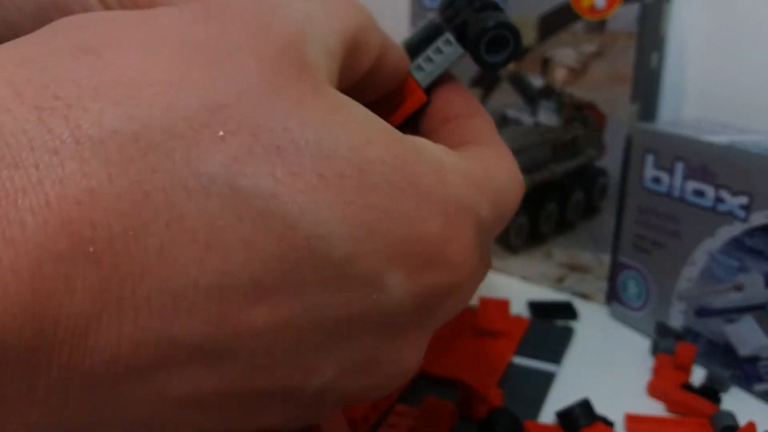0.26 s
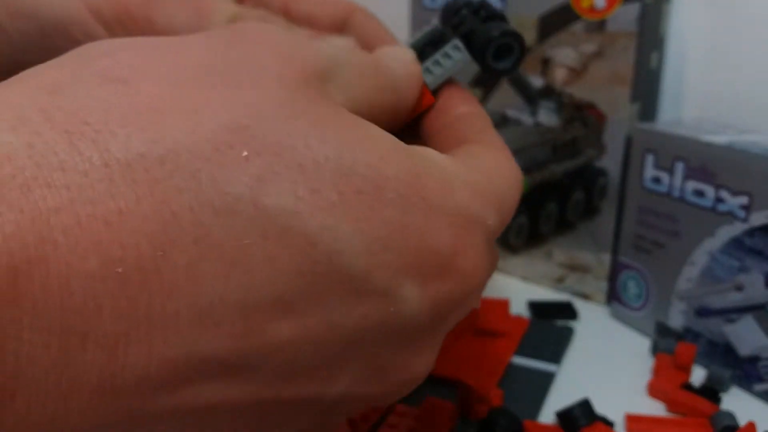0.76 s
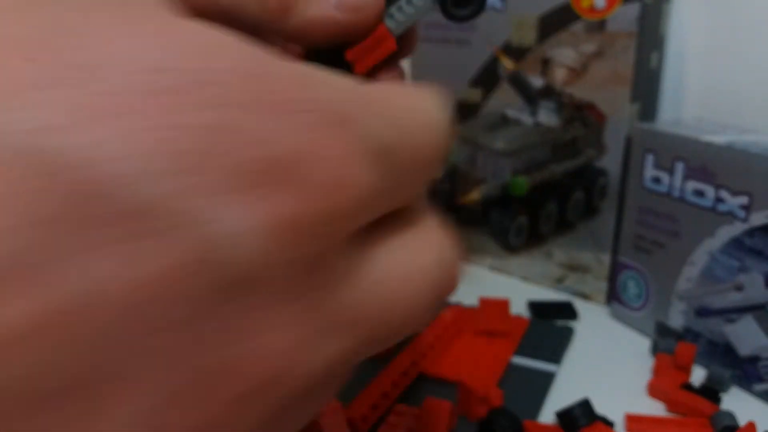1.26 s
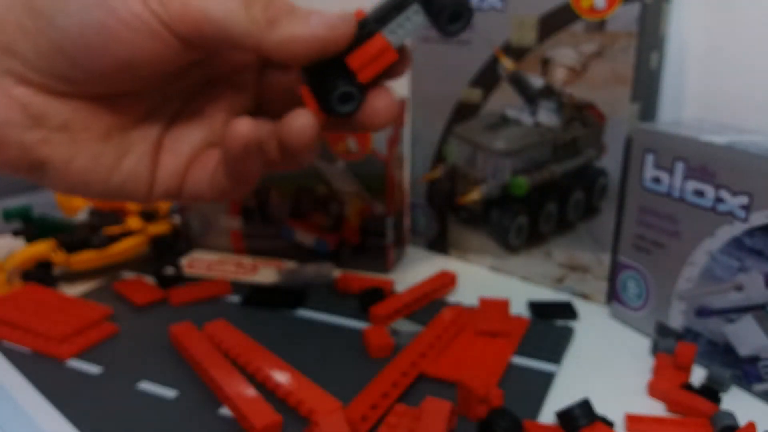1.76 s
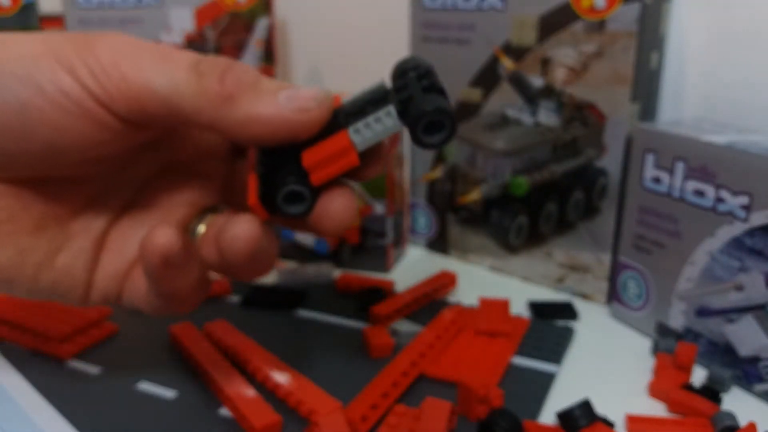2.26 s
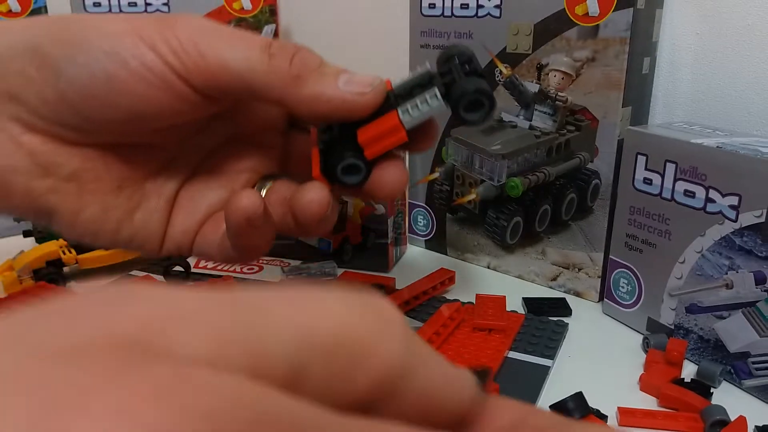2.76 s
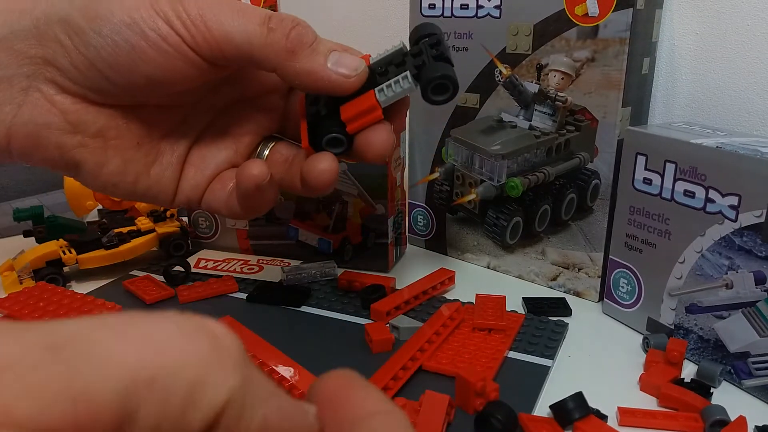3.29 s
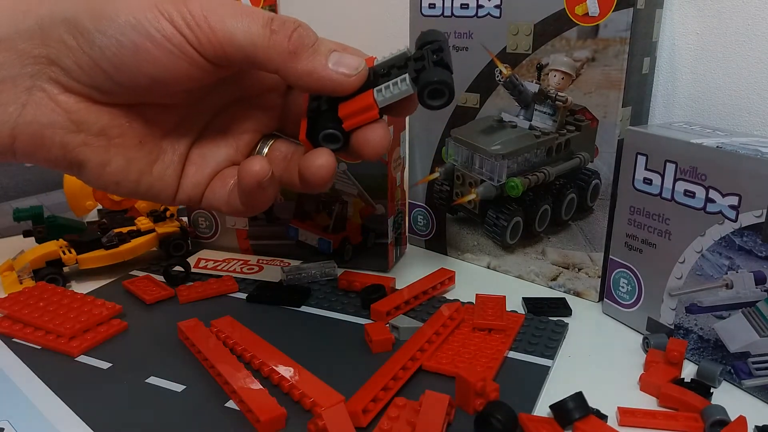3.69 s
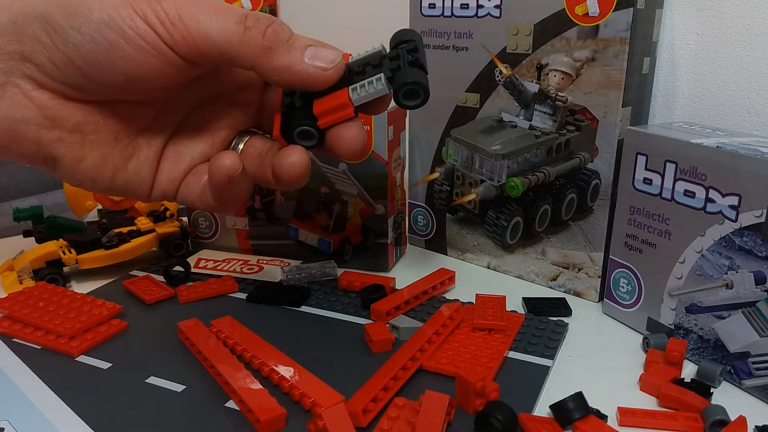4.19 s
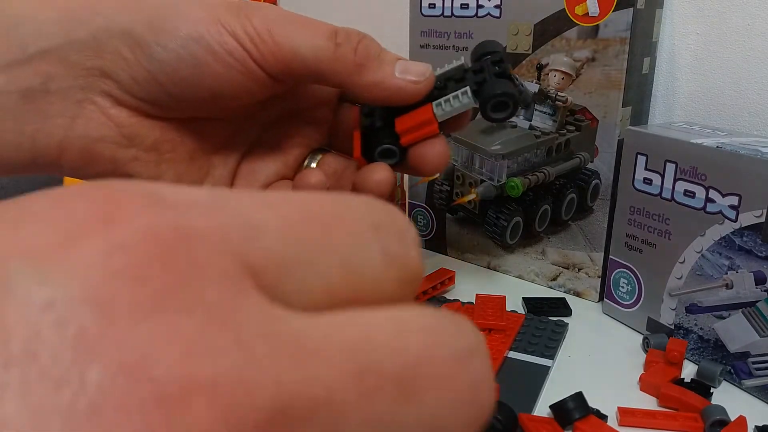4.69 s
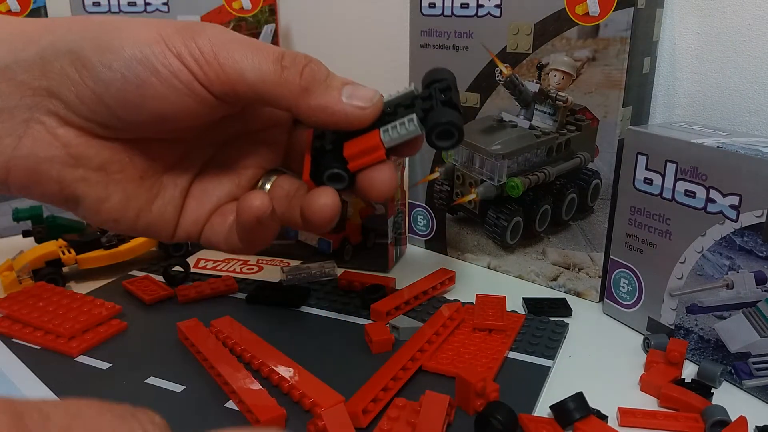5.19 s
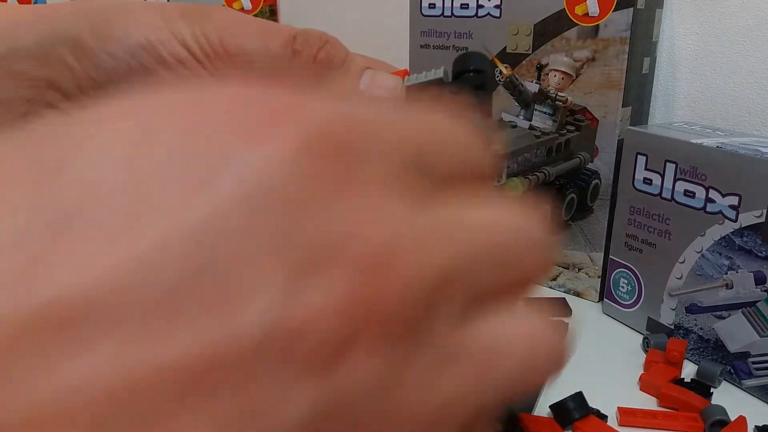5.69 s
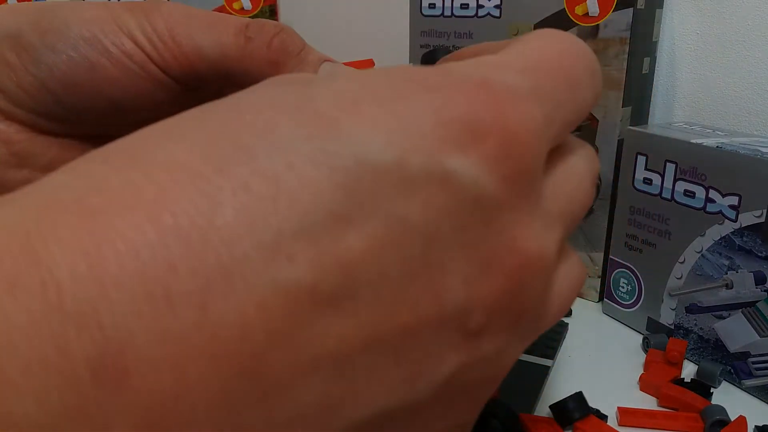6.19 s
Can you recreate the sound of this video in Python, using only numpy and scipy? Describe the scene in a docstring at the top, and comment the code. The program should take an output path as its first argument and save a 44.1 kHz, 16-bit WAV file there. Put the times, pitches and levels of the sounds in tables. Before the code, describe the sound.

Close, dry clicks of small plastic building bricks being handled and dropped on a tabletop in a small quiet room with soft background hiss.

```python
"""Small dry ticks of plastic toy bricks over a steady hiss and a faint mains hum, close up in a small room.
A half-built model ticks and rasps in the fingers, a hand picks among loose bricks: noise bursts, damped
modes and crowds of tiny slips. Loose bricks knock, bounce and settle: double contacts and one weakening
run, ringing a little longer. The table top thuds under them with low modes; early echoes and a short
diffuse tail form the room."""
import sys
import numpy as np
from scipy import signal
from scipy.fft import rfft, irfft
from scipy.io import wavfile

SR = 44100
rng = np.random.default_rng(int(sys.argv[2]) if len(sys.argv) > 2 else 0)


def unload_audio(sound):
    """Save the sound as a 16-bit wav file, at the path given as the first command line argument."""
    columns = np.transpose(np.atleast_2d(sound))
    # keep every value between -1 and 1, then stretch to whole-number steps
    steps = np.round(np.clip(columns, -1, 1) * 32767)
    wavfile.write(sys.argv[1], SR, steps.astype(np.int16))


N = 284434
TOP_HZ = 15900  # upper limit of the recorder
RING_S = 0.25  # length of every ring and of the room response
AGE = np.arange(int(RING_S * SR)) / SR


def undb(db):
    """Decibels to amplitude ratio."""
    return 10 ** (np.asarray(db) / 20)


def unit(x):
    """Scale to an energy of 1."""
    return x / np.sqrt(np.sum(x ** 2))


def fade(t60_s):
    """Exponential decay, 60 dB down after t60_s."""
    return np.exp(-np.log(1000) * AGE / t60_s)


def noise_burst(t60_s):
    """Decaying white noise: modes too crowded to tell apart."""
    return rng.standard_normal(len(AGE)) * fade(t60_s)


def band(x, lo_hz, hi_hz, order=2):
    """Causal band-pass."""
    limits_hz = [lo_hz, min(hi_hz, SR / 2 - 500)]
    return signal.sosfilt(signal.butter(order, limits_hz, "band", fs=SR, output="sos"), x)


def attack_level(x, level_db):
    """Set the rms of the first 5 ms."""
    count = SR // 200
    return x * undb(level_db) / np.sqrt(np.mean(x[:count] ** 2))


def add(track, time_s, x):
    """Mix x into the track at time_s."""
    i = int(time_s * SR)
    track[i:i + len(x)] += x[:N - i]


def ring(modes, detune, scatter_db):
    """Damped modes; each blow lands elsewhere and so weights them anew."""
    hz, level_db, t60_s = np.transpose(modes)
    shift, weight, side = rng.standard_normal((len(hz), 3)).T
    gains = np.sign(side) * undb(level_db + scatter_db * weight)
    detuned_hz = hz * (1 + detune * shift)
    out = np.zeros(len(AGE))
    for gain, mode_hz, mode_t60_s in zip(gains, detuned_hz, t60_s):
        out += gain * np.sin(2 * np.pi * mode_hz * AGE) * fade(mode_t60_s)
    return out


def click(level_db, centre_hz, body_db, edge_db, t60_s, modes, snap_db, modes_db, spread):
    """One contact: a sharp snap, the crowded short modes of the shell, and a few modes that outlast them."""
    shell = unit(noise_burst(t60_s))
    shell[0] += undb(snap_db)  # the contact itself, one brief pulse
    tones = unit(ring(modes, detune=0.006, scatter_db=3.0))
    struck = shell + undb(modes_db) * tones
    # part size sets where it radiates best; plastic damps quickly above that
    wall = band(struck, centre_hz / spread, centre_hz * spread, order=1)
    wall = band(wall, 1220, 6960, order=6)
    # the whole part flexes lower and for longer
    flexing = 1.1 * unit(noise_burst(0.097))
    body = band(flexing + shell + undb(-9) * tones, 474, 1830)
    # hard corners add a bright edge
    edge = band(shell + tones, 5970, 18000)
    out = attack_level(wall, level_db)
    out += attack_level(body, level_db + body_db)
    return out + attack_level(edge, level_db + edge_db)


# loose bricks landing on one edge, then on the other; edge relative to level, second contact to the first:
# (time [s], level [dB], ring centre [Hz], hard edge [dB], second contact [dB])
LANDINGS = [(3.5457, -30.5, 3600, -4, 7.5), (3.6491, -25, 2730, -18, 3.5), (3.6829, -32.5, 2600, -6, -10),
            (3.7308, -33.5, 2800, -8.5, -10), (3.7947, -35.5, 2620, -2.5, 0.5), (3.8252, -38, 3130, -16, 0),
            (4.1094, -53.5, 2330, -17, 9), (4.4733, -25.5, 2470, -11, -15),
            (4.4875, -20.5, 2900, -10.5, -14), (4.5296, -28.5, 3460, -16, -6.5),
            (4.559, -25.5, 3030, -4, -17), (4.5869, -39.5, 3050, -6.5, 5), (4.6155, -36.5, 3000, -17, -6.5),
            (5.433, -42.5, 3530, -2.5, -4)]
SECOND_CONTACT_S = 0.0064


def landings():
    """A brick lands on two edges in turn; yields (time [s], level [dB], ring centre [Hz], hard edge [dB])."""
    for time_s, level_db, centre_hz, edge_db, second_db in LANDINGS:
        yield time_s, level_db, centre_hz, edge_db
        yield time_s + SECOND_CONTACT_S, level_db + second_db, centre_hz, edge_db


# dropped brick rocking until it lies still: (time [s], length [s], level [dB])
RATTLES = [(3.7025, .085, -35)]
ROCK_GAP_S, ROCK_JITTER, ROCK_FALL_DB_PER_S = 0.0115, 0.15, 39.5
ROCK_HZ, ROCK_EDGE_DB = 2550, -13


def rocking():
    """A rocking brick makes uneven, weakening contacts; yields rows like those of landings()."""
    for time_s, length_s, level_db in RATTLES:
        age_s = 0
        while age_s < length_s:
            yield time_s + age_s, level_db - ROCK_FALL_DB_PER_S * age_s, ROCK_HZ, ROCK_EDGE_DB
            age_s += ROCK_GAP_S * np.exp(ROCK_JITTER * rng.standard_normal())


# modes of the loose bricks, relative levels: (frequency [Hz], level [dB], t60 [s])
BRICK_MODES = [(813.5, -7, .07), (1162, 0, 0.055), (1284, -3, 0.071), (1540, -4, 0.081), (1763, 10, 0.022),
               (1934, 2.5, 0.035), (2245, 3.5, 0.031), (2492, -1.5, 0.029), (2793, -6, 0.05),
               (3254, -2.5, 0.032), (3470, -1, 0.032), (4605, 0, .04), (5840, -6.5, 0.088),
               (6210, -9.5, 0.052), (7687, -4, 0.05), (11120, 5.5, 0.032), (15000, -10.5, .03)]
LOOSE_BODY_DB, LOOSE_T60_S = -9.5, 0.036


def loose_bricks():
    """Free bricks ring a little longer as they knock and bounce."""
    out = np.zeros(N)
    for time_s, level_db, centre_hz, edge_db in [*landings(), *rocking()]:
        knock = click(level_db, centre_hz, LOOSE_BODY_DB, edge_db, LOOSE_T60_S, BRICK_MODES,
                      snap_db=-7.5, modes_db=-5, spread=1.365)
        add(out, time_s, knock)
    return out


# light ticks of bricks pressed and shifted in the fingers, and from 2.15 to 2.5 s of a hand picking
# among loose bricks; edge relative to level: (time [s], level [dB], ring centre [Hz], hard edge [dB])
LIGHT_TICKS = [(0.0781, -60, 2980, -34), (0.2096, -62.5, 2380, -32), (0.4244, -63.5, 2900, -15),
               (0.8138, -65.5, 3420, -1), (0.833, -60, 3380, -7), (0.8946, -61, 2880, -14),
               (0.9103, -56.5, 2940, -9), (0.9473, -60.5, 2920, -31), (1.042, -63.5, 2870, -28),
               (1.1985, -44, 3700, -19), (1.231, -56, 3160, -11), (2.1507, -40, 4700, -20),
               (2.1598, -37, 5430, -19), (2.2253, -40, 4400, -13), (2.2466, -37, 3300, -21),
               (2.2555, -34, 3300, -17), (2.2598, -39, 4000, -3), (2.2635, -28, 4600, -16.5),
               (2.319, -35.5, 4400, -19), (2.322, -40, 4750, -28), (2.353, -38, 4570, -11.5),
               (2.4089, -35.5, 2410, -21), (2.4446, -39.5, 4500, -15), (2.4802, -40, 3480, -11),
               (2.4962, -40.5, 3400, -19), (4.214, -55.5, 2660, -19), (5.2766, -43, 3380, -18),
               (5.895, -51, 4100, -14.5), (5.978, -64, 4500, -17), (6.057, -65, 3300, -10),
               (6.4056, -48, 4270, -7)]
# modes of the model in the hand, lent to all light ticks; relative levels:
# (frequency [Hz], level [dB], t60 [s])
MODEL_MODES = [(916, 10, 0.018), (1591, 1.5, 0.049), (1818, 9.5, 0.021), (2002, 4.5, 0.035),
               (2224, 3.5, 0.025), (3160, -10, 0.075), (3543, 0, 0.053), (4120, -12, 0.13),
               (4750, -12, 0.15), (5560, -26.5, 0.052), (6200, 2, 0.023), (6660, 2, 0.038)]
TICK_BODY_DB, TICK_T60_S = -15, 0.034  # fingers damp the low flexing of the part


def light_ticks():
    """Short, dry, finger-damped ticks: studs slipping in their sockets, bricks picked at by the hand."""
    out = np.zeros(N)
    for time_s, level_db, centre_hz, edge_db in list(LIGHT_TICKS) + catches():
        tick = click(level_db, centre_hz, TICK_BODY_DB, edge_db, TICK_T60_S, MODEL_MODES,
                     snap_db=-4.5, modes_db=-8, spread=1.33)
        add(out, time_s, tick)
    return out


# strokes of plastic sliding over plastic and skin, drag relative to level:
# (time [s], attack [s], hold [s], level [dB], drag on the table [dB])
RUBS = [(0.784, .02, .12, -81, -20), (1.111, 0.09, 0.044, -62, -19), (1.254, 0.029, .14, -75.5, -18),
        (2.141, 0.0043, .02, -48, -5), (2.195, 0.019, .01, -53.5, -5), (2.241, 0.016, 0.01, -41, -5),
        (2.285, 0.022, 0.071, -49, -2), (2.377, 0.033, .06, -51, -4.5), (2.474, 0.025, 0.018, -60.5, -5),
        (4.078, 0.031, 0.0093, -49, -4), (5.426, 0.0079, 0.016, -54, 0)]
SLIPS_PER_S, SLIP_SCATTER_DB = 1600, 4
RUB_RELEASE_DB_PER_S = 348.5
RASP_LOW_DB, RASP_WIDE_DB = 7.5, -11  # duller part and faint full-range fizz


def rubbing():
    """Sliding faces catch and let go: tiny uneven slips ring the model, and the table if they touch it."""
    pressure, drag = np.zeros((2, N))
    for time_s, attack_s, hold_s, level_db, table_db in RUBS:
        push = undb(level_db) * stroke(time_s, attack_s, hold_s)
        pressure += push
        drag += undb(table_db) * push
    slips = (rng.random(N) < SLIPS_PER_S / SR) * rng.standard_normal(N)
    slips *= undb(SLIP_SCATTER_DB * rng.standard_normal(N))
    tones = unit(ring(MODEL_MODES, detune=0.0065, scatter_db=1.5))
    shell = unit(noise_burst(0.029)) + undb(-10.5) * tones
    rung = signal.fftconvolve(slips, shell)[:N]
    rasp = band(rung, 1280, 7280, order=5)
    rasp += undb(RASP_LOW_DB) * band(rung, 1020, 3800)
    rasp += undb(RASP_WIDE_DB) * rung
    rumble = band(slips, 220, 1070, order=3)
    return pressure * rasp / np.std(rasp) + drag * rumble / np.std(rumble)


def stroke(time_s, attack_s, hold_s):
    """Finger pressure builds, holds and dies away."""
    age_s = np.arange(N) / SR - time_s
    build = np.clip(age_s / attack_s, 0, 1) ** 2
    return build * undb(-RUB_RELEASE_DB_PER_S * np.clip(age_s - attack_s - hold_s, 0, 1))


CATCHES_PER_S, CATCH_DB, CATCH_SCATTER_DB = 48, -2, 5  # level relative to the stroke
CATCH_HZ, CATCH_EDGE_DB = 3700, -20


def catches():
    """Studs catch during the longer strokes: scattered faint ticks; the shortest strokes have none."""
    rows = []
    for time_s, attack_s, hold_s, level_db, _ in RUBS:
        count = int(hold_s * CATCHES_PER_S)
        for k in range(count):
            catch_s = time_s + attack_s + hold_s * (k + rng.random()) / count
            catch_db = level_db + CATCH_DB + CATCH_SCATTER_DB * rng.standard_normal()
            rows.append((catch_s, catch_db, CATCH_HZ, CATCH_EDGE_DB))
    return rows


# hand bumping the table top; a softer touch reaches less high: (time [s], level [dB], highest [Hz])
BUMPS = [(2.311, -47, 520), (3.551, -33, 1000), (4.094, -46, 242), (5.288, -50.5, 300), (5.35, -53, 406)]
BUMP_S = 0.0097  # span over which a bump's level is taken
THUD_DB, THUD_TOP_HZ = -20.5, 466  # table's answer to a landing, relative to the brick


def table_top():
    """A bump of the hand or a landing brick pushes the board for a moment and wakes its low modes."""
    out = np.zeros(N)
    thuds = []
    for time_s, level_db, _, _, second_db in LANDINGS:
        thuds.append((time_s, level_db + max(second_db, 0) + THUD_DB, THUD_TOP_HZ))
    for time_s, level_db, highest_hz in list(BUMPS) + thuds:
        add(out, time_s, np.sqrt(SR * BUMP_S) * undb(level_db) * board(highest_hz))
    return out


# modes of the table top, relative levels: (frequency [Hz], level [dB], t60 [s])
TABLE_MODES = [(134, -10, 0.18), (210, -2, 0.14), (210, -7.5, 0.086), (313, 0.5, 0.068), (337.3, 0, 0.041),
               (449.5, -5, 0.08), (593, -13, 0.07), (718, -9.5, 0.07), (794, -7, .075)]


def board(highest_hz):
    """The low ring of the table top after one push, with an energy of 1."""
    thud = unit(band(noise_burst(0.07), 180, 500))
    ringing = unit(ring(TABLE_MODES, detune=0.015, scatter_db=4.5)) + undb(-8) * thud
    # a small board radiates next to no deep bass
    return unit(band(ringing, 140, highest_hz, order=3))


# decay of the room: (frequency [Hz], t60 [s])
ROOM_DECAY = [(200, 0.25), (1000, 0.21), (3000, 0.17), (7000, 0.17), (15000, 0.14)]


def room(x, echo_db, tail_db):
    """Cardboard boxes throw back early echoes; the walls add a short diffuse tail."""
    hz, t60_s = np.transpose(ROOM_DECAY)
    edges_hz = np.geomspace(110, 17000, 9)
    tail = np.zeros(len(AGE))
    for lo_hz, hi_hz in zip(edges_hz, edges_hz[1:]):
        band_t60_s = np.interp(np.log(lo_hz * hi_hz) / 2, np.log(hz), t60_s)
        tail += band(rng.standard_normal(len(AGE)), lo_hz, hi_hz, order=3) * fade(band_t60_s)
    tail *= 1 - np.exp(-(AGE / 0.008) ** 2)  # gradual onset
    sparse = (rng.random(len(AGE)) < 0.06) * (AGE > 0.002)
    # the boxes are small, so they reflect only short waves
    echoes = band(noise_burst(0.055) * sparse, 690, 16000)
    response = undb(echo_db) * unit(echoes) + undb(tail_db) * unit(tail)
    return x + signal.fftconvolve(x, response)[:N]


# spectrum shape of room and microphone hiss, relative: (frequency [Hz], density [dB per Hz])
HISS_SHAPE = [(25, -9.5), (45, -19), (72, 0.5), (120, -1.5), (210, -0.5), (300, -4.5), (500, -6.5),
              (1000, -9.5), (2000, -11.5), (3500, -16), (5000, -22), (7500, -29), (10000, -26),
              (15000, -21)]
HISS_DB = -67.5  # rms from 130 Hz to TOP_HZ
# mains hum partials, rms before the waver: (frequency [Hz], level [dB])
HUM_PARTIALS = [(100, -69.5), (200, -85), (300, -91)]


def background():
    """Even shaped-noise hiss under a mains hum of sines that wavers slightly."""
    hz, density_db = np.transpose(HISS_SHAPE)
    bins_hz = np.maximum(np.fft.rfftfreq(N, 1 / SR), 1)
    shape = undb(np.interp(np.log(bins_hz), np.log(hz), density_db))
    hiss = irfft(rfft(rng.standard_normal(N)) * shape, N)
    hiss *= undb(HISS_DB) / np.std(band(hiss, 130, TOP_HZ))
    time_s = np.arange(N) / SR
    knots_s = np.linspace(0, N / SR, 30)
    waver_db = 0.5 * np.interp(time_s, knots_s, rng.standard_normal(len(knots_s)))
    hum = np.zeros(N)
    for partial_hz, level_db in HUM_PARTIALS:
        phase = 2 * np.pi * (partial_hz * time_s + rng.random())
        hum += np.sqrt(2) * undb(level_db) * np.sin(phase)
    return hiss + undb(waver_db) * hum


def scene():
    """Everything on the table sounds into the room, over the background."""
    near = loose_bricks() + light_ticks() + rubbing() + table_top()
    return (room(near, echo_db=-12, tail_db=-14) + background())[None]


def record(dry):
    """The recorder cuts the top steeply."""
    return signal.sosfilt(signal.ellip(10, 0.2, 70, TOP_HZ, fs=SR, output="sos"), dry)


dry = scene()
out = record(dry)
unload_audio(out)
```